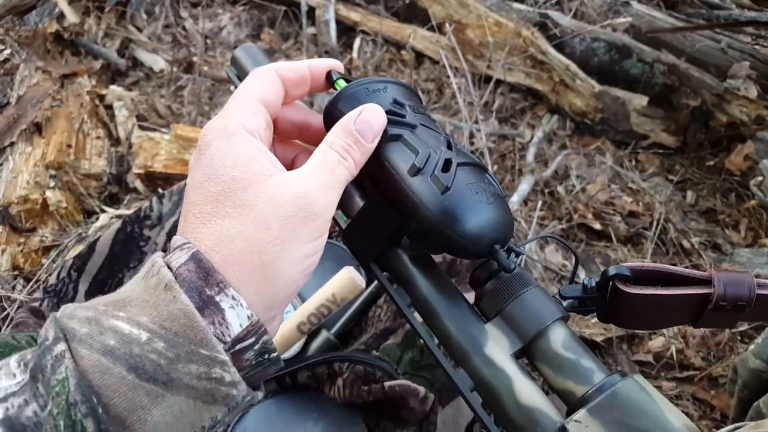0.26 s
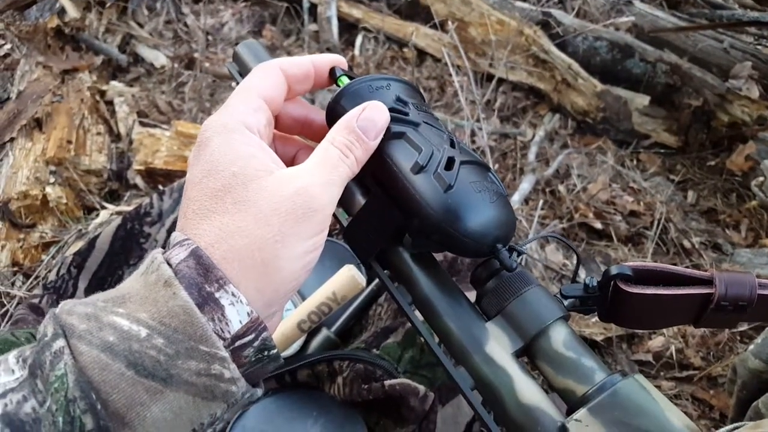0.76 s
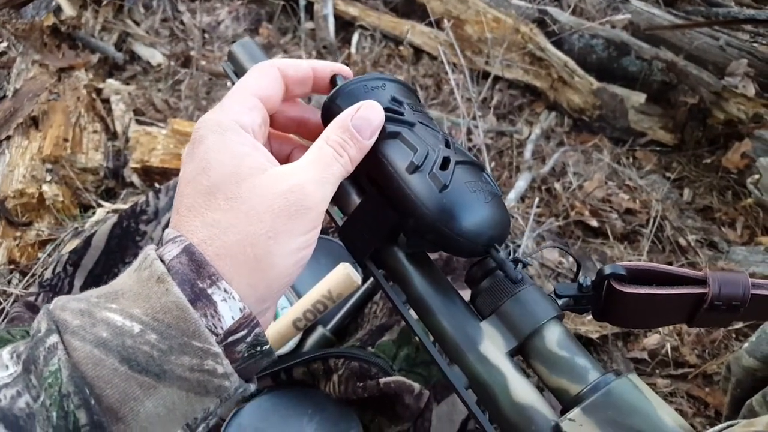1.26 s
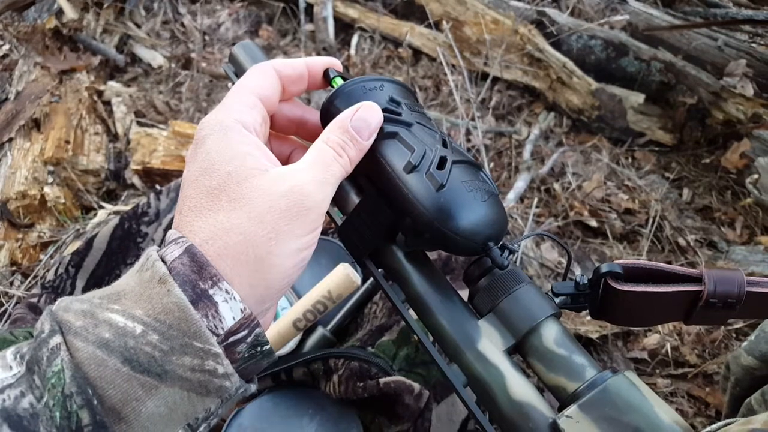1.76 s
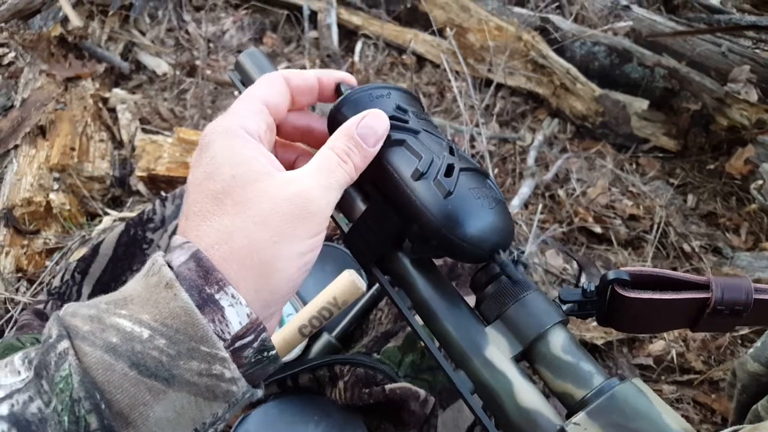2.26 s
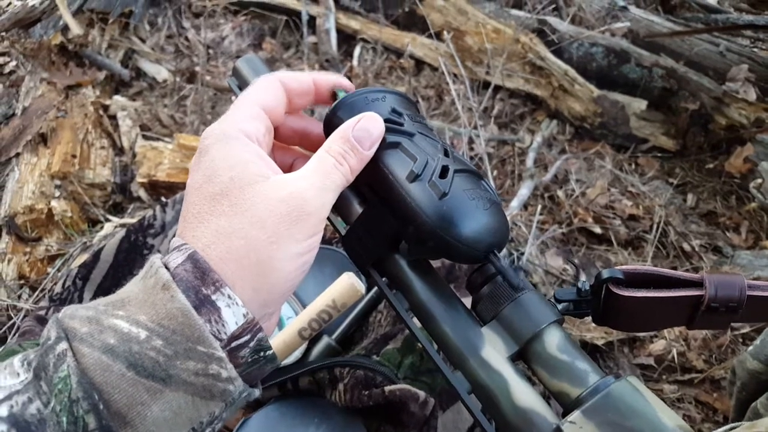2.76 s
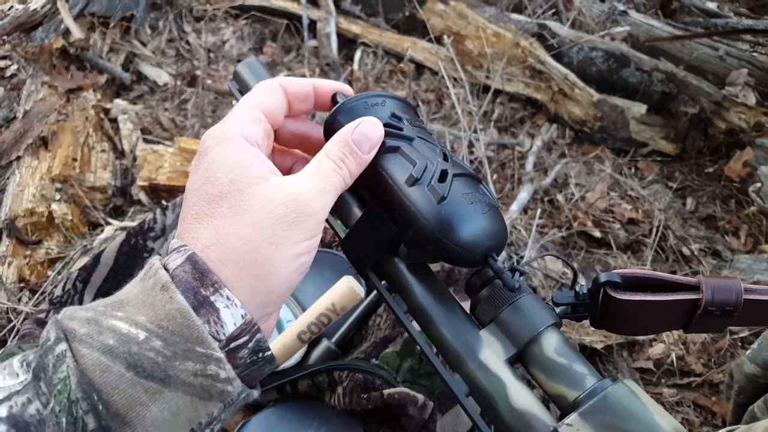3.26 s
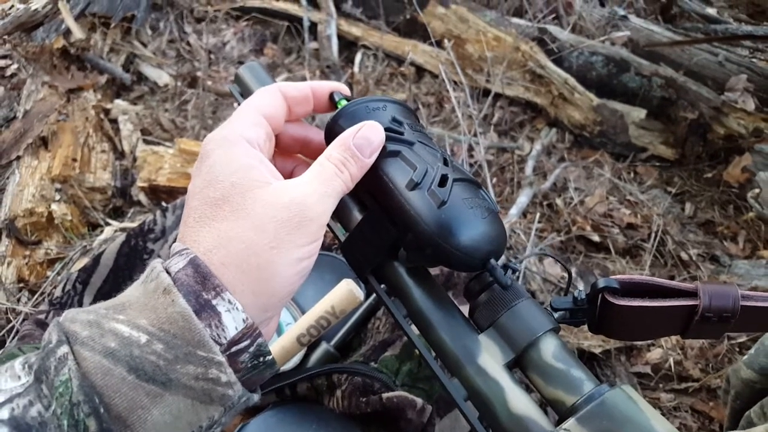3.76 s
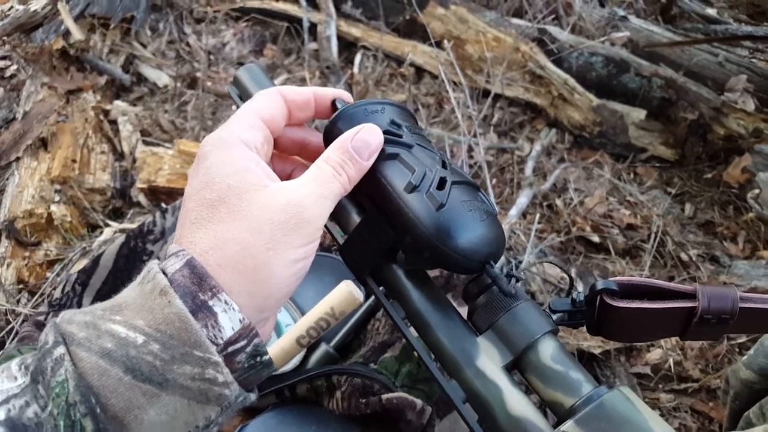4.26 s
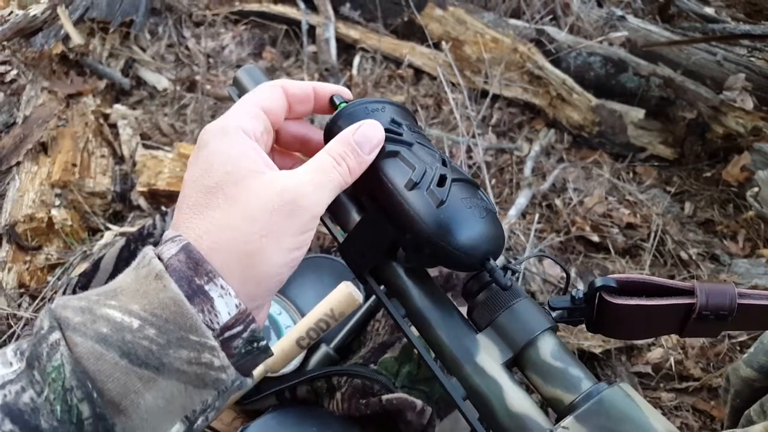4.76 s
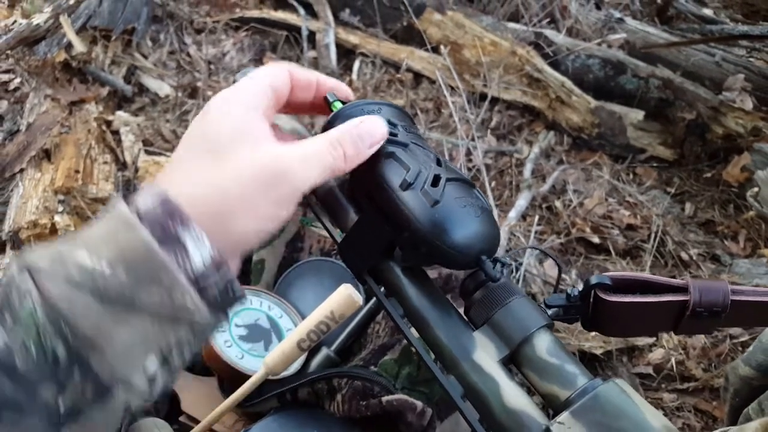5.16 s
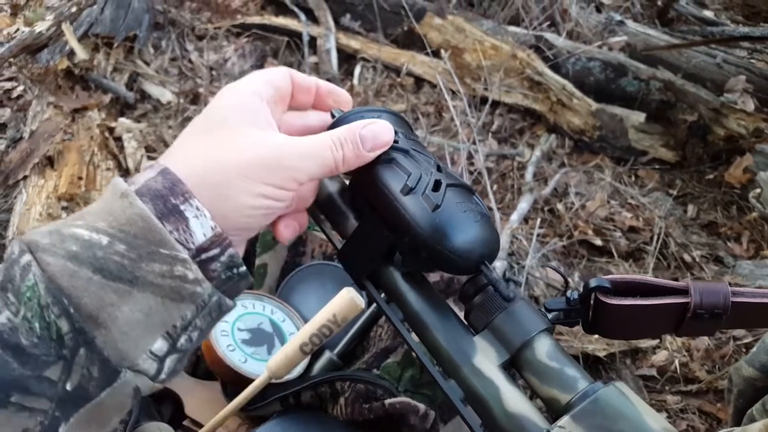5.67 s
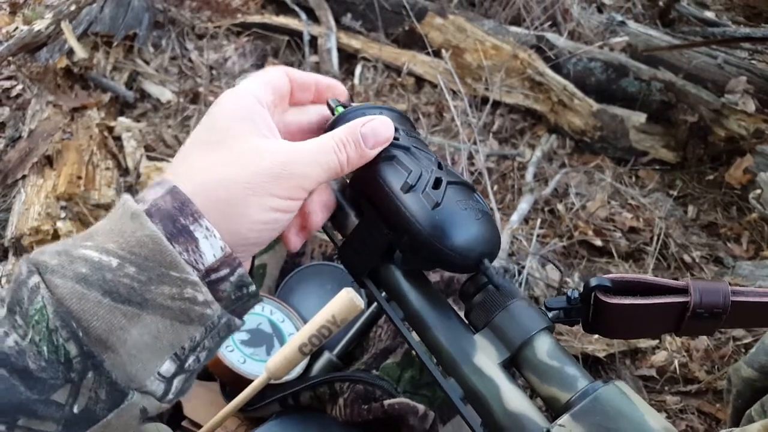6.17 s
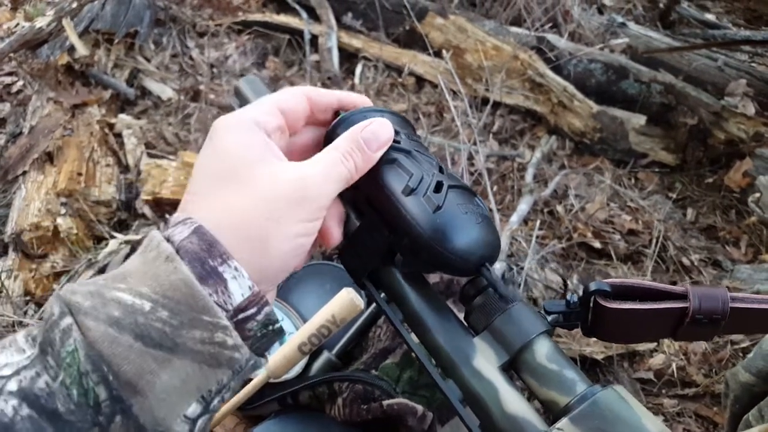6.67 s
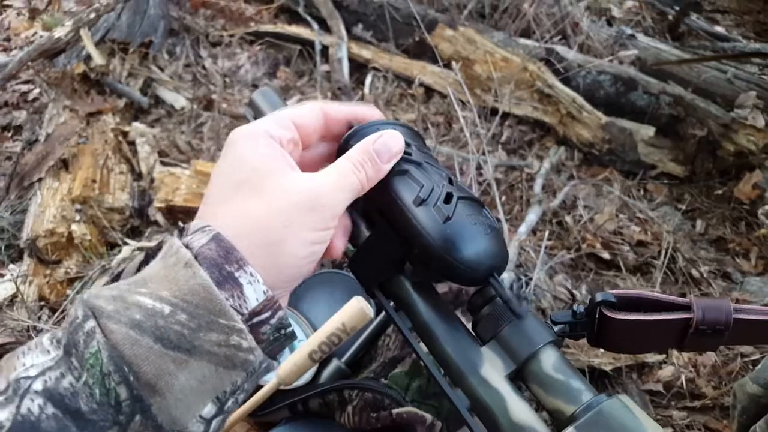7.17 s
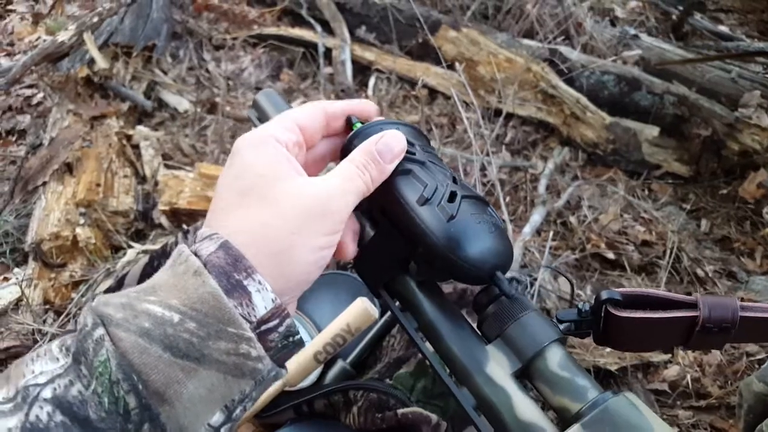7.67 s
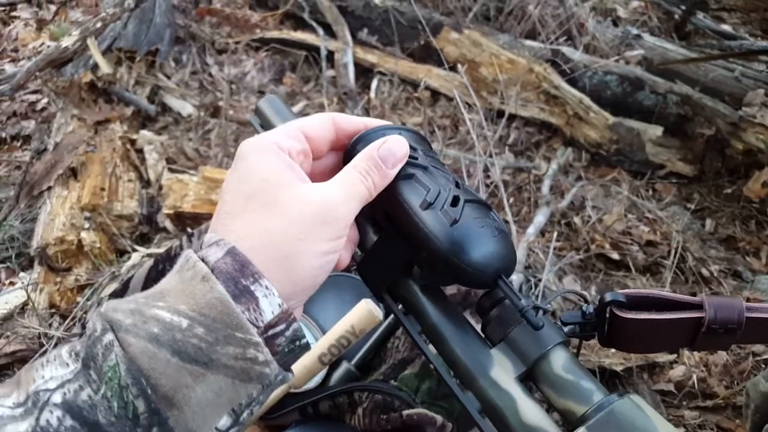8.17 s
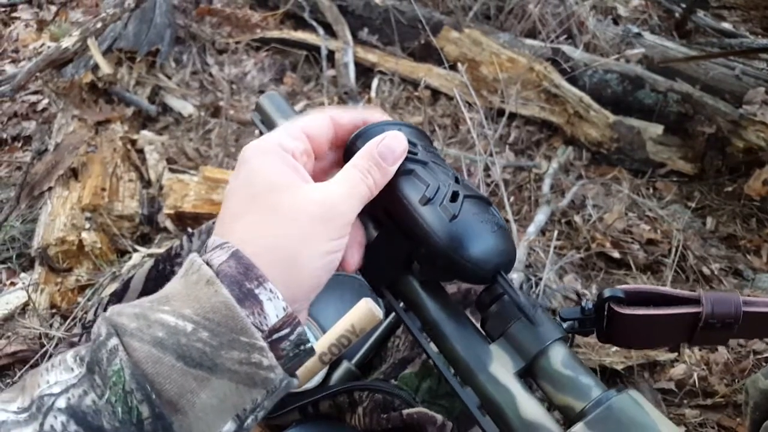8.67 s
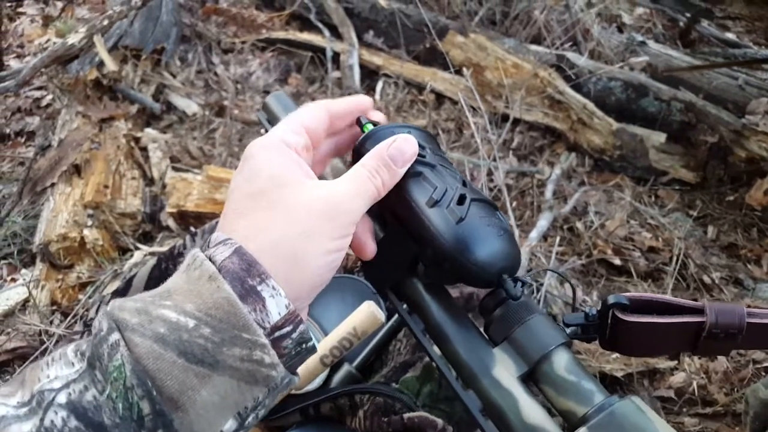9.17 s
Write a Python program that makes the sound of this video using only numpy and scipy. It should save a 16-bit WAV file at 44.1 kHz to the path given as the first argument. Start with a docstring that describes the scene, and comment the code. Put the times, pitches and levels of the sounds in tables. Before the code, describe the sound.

A hand-operated turkey call sounds close and dry over faint woodland air. Single short, raspy clucks come at about 0.5, 1.2, 2.2, 2.8 and 3.2 seconds, with soft scrapes and ticks as the plunger springs back. Around 3.8 seconds there is a rapid flurry of squeaky notes, then four stronger clucks between 4.3 and 5 seconds, with a slight sleeve rustle underneath. Another brief stutter of squeaks follows at about 5.6 seconds. From 6 seconds the call turns a little brighter and slightly softer, settling into an even run of clucks, about three a second, until 9 seconds. A couple of small plunger ticks close the run. Now and then the hand knocks very lightly on the housing. A small, distant bird gives very faint, thin, high whistles at around 1.1 and 5.2 seconds.

```python
"""Push-pull turkey call in quiet woods

One finger drives a striker over a plate, and stick-slip friction excites the resonances of a chamber.
A light push squeals; under a hard push the striker bounces and the tone chatters into a cluck.
A spring returns the plunger with a soft scrape and a tick. Far off, a small bird whistles thinly."""
import sys
import numpy as np
from scipy import signal
from scipy.fft import rfft, irfft, next_fast_len
from scipy.io import wavfile
from scipy.ndimage import uniform_filter1d, minimum_filter1d, map_coordinates

SR = 44100
rng = np.random.default_rng(int(sys.argv[2]) if len(sys.argv) > 2 else 0)


def transcribe(signal):
    """Save signal, clipped to [-1, 1], as a 16-bit WAV file at the path in sys.argv[1]."""
    frames = np.atleast_2d(signal).T
    limited = np.clip(frames, -1, 1)
    pcm = np.round(limited * 32767).astype(np.int16)
    wavfile.write(sys.argv[1], SR, pcm)


N = 414981
BINS = np.fft.rfftfreq(4096, 1 / SR)

# Levels are relative within each table.
# spectra of still air, of its low rumble, and of a sleeve and leaves stirring: f/Hz, level/dB
AIR_SPECTRUM = [(30, -12), (100, -6), (300, -2.5), (700, -6.5), (1100, -9.5), (1500, -10), (3500, -14),
                (7000, -20.5), (9000, -30.5), (15500, -20)]
RUMBLE_SPECTRUM = [(32, -27), (50, -3), (85, -4.5), (130, -8), (200, -14.5), (500, -33)]
STIR_SPECTRUM = [(120, -5.5), (420, -2), (700, -5.5), (1000, 1.5), (1250, -12.5), (3000, -17.5),
                 (9000, -34.5)]
# envelopes of the rumble and the stirring: t/s, level/dB
RUMBLE_ENVELOPE = [(0, -71.5), (4, -70.5), (6.3, -68), (7.2, -78.5), (9.4, -77)]
STIR_ENVELOPE = [(0, -81), (2.6, -84), (3.6, -72), (4.6, -65.5), (5.3, -65.5), (5.6, -74), (6.4, -69.5),
                 (7.2, -85.5), (9.4, -86)]
# coherence of ambient and of friction noise between the two microphone ports: f/Hz, coherence/1
AIR_COHERENCE = [(40, 0.3), (130, .8), (400, 0.13), (1000, .3), (3000, 0.033)]
FRICTION_COHERENCE = [(100, 0.57), (1300, 1), (2400, 0.28), (3500, 0.88), (6500, 1), (9000, 1),
                      (16000, 0.5)]

# hard pushes, timed from the striker's bite: t/s, hold/s, release/s, level/dB
HARD_PUSHES = [(0.544, .03, 0.005, -10), (1.244, 0.028, 0.04, -12.5), (2.151, 0.033, 0.015, -12.5),
               (2.79, 0.039, 0.026, -13), (3.244, .042, .013, -12), (4.269, 0.031, .022, -10.5),
               (4.462, .029, 0.016, -9.5), (4.72, .027, 0.0098, -11.5), (4.976, 0.031, 0.025, -11.5),
               (6.035, 0.035, 0.027, -13.5), (6.227, 0.043, 0.0092, -14.5), (6.576, 0.039, 0.032, -14.5),
               (6.888, 0.068, 0.026, -16), (7.189, 0.051, 0.023, -16.5), (7.501, 0.065, 0.011, -16.5),
               (7.804, .072, 0.012, -17), (8.114, 0.06, 0.0063, -16), (8.41, 0.045, 0.021, -17),
               (8.696, 0.055, .01, -16.5), (8.999, 0.045, 0.013, -17)]
# chatter of the clucks, as the finger eases off midway and bears down in the last run: t/s, chatter/1
CLUCK_CHATTER = [(.5, 0.68), (2.2, 0.89), (3.3, 0.65), (4.7, 0.61), (6.2, .8), (6.9, 0.73), (7.2, 0.86),
                 (8.4, 0.97), (9, .88)]
# light pushes, with their pitch at full grip: t/s, hold/s, level/dB, f/Hz
LIGHT_PUSHES = [(2.204, 0.0086, -28, 760), (2.83, 0.026, -16, 745), (3.797, .022, -11, 714),
                (3.85, 0.019, -12, 779), (3.902, 0.025, -12.5, 775), (3.945, .027, -10.5, 709.7),
                (3.983, .02, -12.5, 802), (4.032, .011, -13, 788), (5.024, .017, -10.5, 713.6),
                (5.585, 0.041, -10.5, 676.4), (5.626, 0.033, -13, 782.6), (5.664, .011, -29, 914),
                (5.704, .046, -11.5, 700.6), (5.758, 0.051, -27, 813), (6.974, .03, -17.5, 786)]
# spectra of the chamber, the plate's grit and one bounce of the striker: f/Hz, level/dB
CHAMBER_RESPONSE = [(150, -62.5), (400, -39), (560, -26), (780, -28), (1050, 1.5), (1300, 0.5), (1560, 1.5),
                    (1850, -3), (2200, -28), (2900, -21.5), (3600, -31), (5600, -44.5), (8000, -50),
                    (9300, -79)]
RASP_SPECTRUM = [(100, -23), (350, -22), (600, -6), (1200, -5), (2000, 1.5), (3100, 7), (3700, 1),
                 (6000, -8.5), (8000, -6.5), (9300, -42), (10000, -48), (11000, -30), (15500, -28)]
BOUNCE_SPECTRUM = [(110, -26), (160, -17.5), (260, -28.5), (480, -9.5), (750, -14), (1100, 0.5), (1900, 5),
                   (2200, -0.5), (2500, 9), (3600, -13), (5100, -9), (6300, -20), (7700, -12), (9300, -51)]
# modes of the return spring: f/Hz, level against the cluck/dB, T60/s
SPRING_MODES = [(1170, -44.5, .3), (1720, -42.5, .3), (3280, -53, .35), (4720, -65.5, .35)]

# knocks of the hand on the housing, and ticks of the plunger on its stop: t/s, peak level/dB
HAND_KNOCKS = [(0.645, -41), (0.79, -51), (3.102, -56), (4.86, -52), (8.768, -53)]
STOP_TICKS = [(0.7205, -36), (1.43, -39.5), (2.3788, -39.5), (2.986, -37.5), (3.4686, -40), (5.202, -44.5),
              (6.3986, -31), (6.7918, -39.5), (7.152, -36.5), (7.458, -46), (8.6426, -38.5), (8.8368, -33),
              (8.9226, -30.5), (9.0943, -35), (9.1768, -35)]
# how briskly the finger lets the plunger return: t/s, slide duration/s, level/dB
RETURN_PACE = [(0.701, 0.063, -52), (2.3, 0.13, -55), (3.4, .086, -53.5), (4.2, 0.078, -48.5),
               (4.4, 0.12, -53.5), (4.87, 0.082, -56), (5.2, 0.084, -49.5), (7.101, 0.087, -50.5),
               (7.6, 0.12, -53), (8.3, 0.13, -50.5), (9.1, 0.099, -53.5)]
# spectra of a knock, of the scrape and tick, and of the slide at its fastest: f/Hz, level/dB
KNOCK_SPECTRUM = [(30, -23), (70, -2.5), (150, -10), (300, -9), (480, -1.5), (900, -15), (1400, -18),
                  (5000, -37), (9000, -45)]
SCRAPE_SPECTRUM = [(300, -26.5), (600, -1), (780, -22), (1100, 6), (1550, 5.5), (2250, -5), (2650, -10),
                   (3100, -3.5), (4200, -17), (5500, -16), (6400, -13.5), (7700, -7), (9300, -47),
                   (12500, -24), (15800, -39)]
WHISTLE_SPECTRUM = [(800, -28.5), (1500, -4), (2050, -2.5), (2330, 2), (2700, -7.5), (4500, -24),
                    (5900, -20.5), (6350, -8.5), (7000, -19), (9300, -52)]
# songs made of paired slurs: t/s, pair period/s, top f/Hz, level/dB
BIRD_SONGS = [(1.112, .198, 7430, -62.5), (5.198, 0.16, 7360, -62.5)]
# change in the notes and in the scrapes once the sound hole is uncovered: f/Hz, gain/dB
OPEN_HOLE_NOTES = [(300, 1), (450, 1), (600, -3.5), (1100, -0.5), (1500, 1), (1950, 5.5), (2350, 8),
                   (2900, 3), (5000, 1), (12000, 2)]
OPEN_HOLE_SCRAPES = [(600, -7.5), (1100, -5.5), (1600, -2.5), (2080, 3), (2330, 11.5), (2620, 1.5),
                     (4200, -1), (6400, -1), (12000, -1)]

# reverberation of nearby leaves and logs, and of far trunks: f/Hz, T60/s
GROUND_DECAY = [(300, .04), (1500, 0.072), (3000, 0.084), (8000, 0.047)]
TRUNK_DECAY = [(300, 0.88), (1500, 1.9), (3000, 0.25), (8000, 0.12)]
# left port against the right: f/Hz, gain/dB
LEFT_GAIN = [(300, -1), (700, -3), (1200, -1.5), (1450, -3), (1700, -8), (2000, -1.5), (2800, -8.5),
             (3600, -4), (5300, -3), (6100, 8), (7000, -1), (8000, -17), (11000, 1.95), (15000, 4.82)]
# left port against the right: f/Hz, phase lead/rad
LEFT_PHASE = [(300, 1), (600, 0.21), (1540, 0.35), (1720, 1.67), (2000, 0.85), (2300, 1.48), (2750, 1.65),
              (3400, -4), (4500, -4.5), (6500, -8)]


def amp(db):
    """Amplitude ratio of a level in decibels."""
    return 10 ** (np.asarray(db) / 20)


def at_frequency(table, hz):
    """Interpolation on a logarithmic frequency axis."""
    f, value = np.transpose(table)
    return np.interp(np.log(hz + 1), np.log(f + 1), value)


def add(mix, start, sound):
    """Superposition of a sound on the mix, from a start time in seconds."""
    part = mix[..., max(round(start * SR), 0):][..., :sound.shape[-1]]
    part += sound[..., :part.shape[-1]]


def impulse_response(spectrum):
    """Minimum-phase response, obtained by folding the cepstrum onto positive time."""
    cepstrum = irfft(at_frequency(spectrum, BINS) * np.log(10) / 20)
    cepstrum[1:len(BINS) - 1] *= 2
    cepstrum[len(BINS):] = 0
    return irfft(np.exp(rfft(cepstrum)))[:len(BINS) // 2]


def colour(x, spectrum):
    """Convolution with a unit-energy response, which conserves the power of white noise."""
    taps = impulse_response(spectrum)
    taps = taps / np.linalg.norm(taps)
    return signal.oaconvolve(x, taps.reshape((1,) * (x.ndim - 1) + (-1,)), axes=-1)[..., :x.shape[-1]]


def wander(n, hz):
    """Smooth random modulation of rms about 1, with hz new values a second."""
    knots = rng.standard_normal(n)[:int(n * hz / SR) + 2]
    return map_coordinates(knots, [np.arange(n) * hz / SR], order=2, mode="nearest")


def noise_pair(coherence):
    """Partially coherent white noise at two ports: a common part plus an independent one."""
    common, independent = rfft(rng.standard_normal((2, next_fast_len(N))))
    share = np.clip(at_frequency(coherence, np.linspace(0, SR / 2, len(common))), 0, 1)
    left = share * common + np.sqrt(1 - share ** 2) * independent
    return irfft([left, common], next_fast_len(N))[:, :N]


def ambience(air_db=-71, hum_hz=107, hum_db=-75.5, hum_fade_db_per_s=.39):
    """Amplitude-modulated noise gives air, rumble and stirring; a far hum wavers and fades."""
    t = np.arange(N) / SR
    air = amp(air_db + .7 * wander(N, 2.7)) * colour(noise_pair(AIR_COHERENCE), AIR_SPECTRUM)
    rumble_db = np.interp(t, *np.transpose(RUMBLE_ENVELOPE))
    rumble = amp(rumble_db) * colour(noise_pair(AIR_COHERENCE), RUMBLE_SPECTRUM)
    stir_db = np.interp(t, *np.transpose(STIR_ENVELOPE)) + .89 * wander(N, 36)
    stir = amp(stir_db) * colour(noise_pair(AIR_COHERENCE), STIR_SPECTRUM)
    hum_envelope = amp(hum_db - hum_fade_db_per_s * t + 2.5 * wander(N, 3.7))
    hum = hum_envelope * np.sin(2 * np.pi * np.cumsum(hum_hz + wander(N, 4)) / SR)
    return air + rumble + stir + hum


def strokes(cluck_hz=699, squeal_release_s=.012, clean_hz=800, chatter_per_hz=.0028, skitter_db=-22):
    """Grip governs roughness. Every push in order: t/s, hold/s, release/s, level/dB, f/Hz, chatter/1."""
    rows = [(start, hold, release, db, cluck_hz, np.interp(start, *np.transpose(CLUCK_CHATTER)))
            for start, hold, release, db in HARD_PUSHES]
    for start, hold, db, hz in LIGHT_PUSHES:
        # a faint touch barely grips and skitters; other squeals roughen as grip lowers their pitch
        chatter = .42 if db < skitter_db else chatter_per_hz * (clean_hz - hz)
        rows.append((start, hold, squeal_release_s, db, hz, chatter))
    return sorted(rows)


def slip_wave(cycles, firmness):
    """Symmetric motion has only odd harmonics; a firm grip sticks on one side and adds even ones."""
    odd = sum(k ** (.29 * (firmness - 1)) * np.cos(2 * np.pi * k * cycles) for k in range(1, 13, 2))
    even = sum(np.cos(2 * np.pi * k * cycles) for k in range(2, 13, 2))
    return odd + .94 * firmness ** 2 * even


def stick_slip(hold, release, db, gripped_hz, chatter, free_hz=1080, firm_hz=770, bounce_hz=158):
    """Relaxation oscillation of one push. Returns lead/s and (tone, rasp envelope, bounce impulses)."""
    chatter = np.clip(chatter, 0, 1)
    lead = .0125 * (1 - .35 * chatter)  # a hard push bites sooner
    t = np.arange(-lead, hold + 2 * release, 1 / SR)
    grip_times = [-lead, -lead * .3, 0, hold / 4, hold / 2, hold, hold + release * .81, hold + release]
    grip = np.interp(t, grip_times, [.54, .3, .76, .97, 1, .8, .066, .24])
    attack = np.clip((t + lead) / (lead * 1.1), 0, 1)
    fade_db = -27 * (np.maximum(t - hold, 0) / release) ** 3.1
    slack_db = 8 * (np.minimum(grip / .75, 1) - 1)
    force = attack * amp(fade_db + slack_db)

    # pressed hard, the striker bounces unevenly and the slips lose their periodicity
    roughness = chatter * np.interp(t, [-lead, 0, hold * .35, hold, hold + release], [.059, .54, 1, .8, 1])
    bounces = np.cumsum(bounce_hz * np.exp(.16 * wander(len(t), bounce_hz))) / SR
    bounce_db = 5.5 * (np.cos(2 * np.pi * bounces) - .24) + .4 * wander(len(t), 250)
    contact = force * amp(roughness * bounce_db)
    jitter = roughness ** .55 * wander(len(t), 700)
    detuning = .18 * roughness * (np.sin(2 * np.pi * bounces) + jitter) + .012 * wander(len(t), 250)

    # a firmer grip slows the slips, until their second harmonic meets the chamber's resonance
    slip_hz = free_hz + (gripped_hz - free_hz) * grip
    cycles = np.cumsum(slip_hz * np.exp(detuning)) / SR
    firmness = np.clip((free_hz - slip_hz) / (free_hz - firm_hz), 0, 1)
    tone = colour(contact * slip_wave(cycles, firmness), CHAMBER_RESPONSE)
    tone /= np.sqrt(np.mean(tone[(t > 0) & (t < hold)] ** 2))

    speed = np.sin(np.pi * np.clip((t + lead) / (lead + hold + release * .5), 0, 1))
    rasp = np.sqrt(contact * force) * (.05 + roughness ** 1.59) * (.41 + .91 * speed ** 2 + .45 * grip)
    rasp *= 1 + .47 * np.cos(2 * np.pi * cycles)  # the grit pulses with each slip
    landings = np.diff(np.floor(bounces), prepend=0)
    impacts = landings * force * roughness ** 2 * speed * amp(.87 * wander(len(t), 440))
    return lead, amp(db) * np.array([tone, rasp, impacts])


def pushes(rasp_db=-16, impact_db=11.5):
    """Clucks and squeals superpose chamber tone, friction noise and the impacts of the striker."""
    parts = np.zeros((3, N))
    for start, *stroke in strokes():
        lead, sound = stick_slip(*stroke)
        add(parts, start - lead, sound)
    tone, rasp, impacts = parts
    grit = colour(rasp * noise_pair(FRICTION_COHERENCE), RASP_SPECTRUM)
    return tone + amp(rasp_db) * grit + amp(impact_db) * colour(impacts, BOUNCE_SPECTRUM)


def spring_ring(abrupt_s=.006, loss_db_per_s=700, attack_s=.003):
    """Damped free vibration: the more abruptly a cluck is released, the more the spring rings."""
    out, t = np.zeros(N), np.arange(SR // 3) / SR
    for start, hold, release, db in HARD_PUSHES:
        phases = rng.random(len(SPRING_MODES))
        modes = sum(amp(mode_db - 60 * t / t60) * np.sin(2 * np.pi * (hz * t + phase))
                    for (hz, mode_db, t60), phase in zip(SPRING_MODES, phases))
        loss_db = loss_db_per_s * max(release - abrupt_s, 0)
        add(out, start + hold, amp(db - loss_db) * np.minimum(t / attack_s, 1) * modes)
    return out


def dry_impacts(events, spectrum, t60, gain_db):
    """Heavily damped impacts: each knock or tick is a noise burst with exponential decay."""
    out, t = np.zeros(N), np.arange(SR // 16) / SR
    for start, db in events:
        hit = colour(rng.standard_normal(len(t)) * amp(-60 * t / t60), spectrum)
        add(out, start, amp(db + gain_db) * hit / abs(hit).max())
    return out


def return_strokes(finger_lift_s=.11, longest_return_s=.225, overrun_s=.008):
    """The restoring force returns the plunger in each long enough pause: start/s, end/s, level/dB."""
    rows, notes = [], strokes()
    times, lengths, levels = np.transpose(RETURN_PACE)
    next_starts = [note[0] for note in notes[1:]] + [N / SR]
    for (start, hold, release, *_), next_start in zip(notes, next_starts):
        lifted = start + hold + release
        pause = min(next_start - lifted, longest_return_s)
        if pause > finger_lift_s:
            middle = lifted + .58 * pause
            length, db = np.interp(middle, times, lengths), np.interp(middle, times, levels)
            # the slide ends at a tick of the stop, where there is one
            stops = [tick + overrun_s for tick, _ in STOP_TICKS if lifted < tick < lifted + pause]
            end = max(stops, default=middle + length / 2)
            rows.append((end - length, end, db))
    return rows


def return_scrape(gain_db=3.5, grain_db=2, whistle_db=-3, spread_s=.0027):
    """Sliding friction: the unloaded striker's noise swells with speed, nearly whistling at the peak."""
    scrape, whistle = np.zeros((2, N))
    for start, end, db in return_strokes():
        progress = np.linspace(0, 1, int(max(end - start + 2 * spread_s, .01) * SR))
        off_peak = (2 * (progress - .46)) ** 2
        envelope = amp(db + gain_db) * signal.windows.tukey(len(progress), .3)
        add(scrape, start - spread_s, envelope * amp(-15 * off_peak))
        add(whistle, start - spread_s, envelope * amp(whistle_db - 40 * off_peak))
    grain = amp(grain_db * wander(N, 490)) * noise_pair(FRICTION_COHERENCE)
    hiss = noise_pair(FRICTION_COHERENCE)
    return colour(scrape * grain, SCRAPE_SPECTRUM) + colour(whistle * hiss, WHISTLE_SPECTRUM)


def bird(pairs=4, slur_s=.078, glide_hz=1000, rise_s=.024, sink_hz_per_s=190, delay_s=.084, drop_hz=100):
    """Frequency-modulated whistles glide up and level off; the second of each pair lies lower."""
    out, t = np.zeros(N), np.arange(int(slur_s * SR)) / SR
    for start, period, top_hz, db in BIRD_SONGS:
        for pair, second in np.ndindex(pairs, 2):
            plateau_hz = top_hz - sink_hz_per_s * pair * period - second * drop_hz
            hz = plateau_hz - glide_hz * np.exp(-t / rise_s) + 50 * wander(len(t), 300)
            slur = np.sin(np.pi * t / slur_s) * np.sin(2 * np.pi * np.cumsum(hz) / SR)
            add(out, start + pair * period + second * delay_s, amp(db + 2 * rng.standard_normal()) * slur)
    return out


def sound_hole(x, change, uncover_at_s=5.88, shift_s=.03):
    """The housing's transfer function changes as the hand shifts and uncovers the sound hole."""
    opening = np.clip((np.arange(N) / SR - uncover_at_s) / shift_s, 0, 1)
    uncovered = signal.oaconvolve(x, impulse_response(change)[None], axes=1)[:, :N]
    return (1 - opening) * x + opening * uncovered


def scattering(x, decay, build_s, echoes_per_s=2500):
    """Reverberation by scattering: random echoes build up, and each band decays at its own rate."""
    echoes = rng.standard_normal((2, SR)) * (rng.random((2, SR)) < echoes_per_s / SR)
    hz, t, bands = signal.stft(echoes, SR, nperseg=256)
    envelope = amp(-60 * t / at_frequency(decay, hz)[:, None]) * (1 - np.exp(-t / build_s))
    tail = signal.istft(bands * envelope, SR, nperseg=256)[1]
    return signal.fftconvolve(x[None], tail / np.linalg.norm(tail[0]), axes=1)[:, :N]


def port_shadow(x):
    """An acoustic shadow alters the magnitude and phase of the sound at the left port."""
    response = amp(at_frequency(LEFT_GAIN, BINS)) * np.exp(1j * at_frequency(LEFT_PHASE, BINS))
    left = signal.oaconvolve(x[0], np.fft.fftshift(irfft(response)))[len(BINS) - 1:][:N]
    return np.array([left, x[1]])


def scene(call_db=.8, near_echo_db=-28, far_echo_db=-60, bird_db=-8, bird_echo_db=5):
    """Direct and reverberant fields add: the close call is nearly dry, the distant bird mostly echo."""
    returns = return_scrape() + dry_impacts(STOP_TICKS, SCRAPE_SPECTRUM, t60=.035, gain_db=2.5)
    notes = pushes() + spring_ring()
    call = amp(call_db) * (sound_hole(notes, OPEN_HOLE_NOTES) + sound_hole(returns, OPEN_HOLE_SCRAPES))
    song = amp(bird_db) * bird()
    near = scattering(amp(near_echo_db) * call[1] + song, GROUND_DECAY, build_s=.003)
    far = scattering(amp(far_echo_db) * call[1] + amp(bird_echo_db) * song, TRUNK_DECAY, build_s=.055)
    knocks = dry_impacts(HAND_KNOCKS, KNOCK_SPECTRUM, t60=.045, gain_db=2)
    return port_shadow(call) + knocks + song + near + far + ambience()


def record(dry, window_samples=128, cutoff_hz=15950):
    """Fast limiting holds the peaks at full scale; a low-pass filter then bounds the bandwidth."""
    allowed_gain = 1 / np.maximum(abs(dry).max(0), 1)
    gain = uniform_filter1d(minimum_filter1d(allowed_gain, window_samples), window_samples)
    lowpass = signal.firwin(511, cutoff_hz, window=("kaiser", 9), fs=SR)
    return signal.oaconvolve(dry * gain, lowpass[None], "same")


dry = scene()
out = record(dry)
transcribe(out)
```